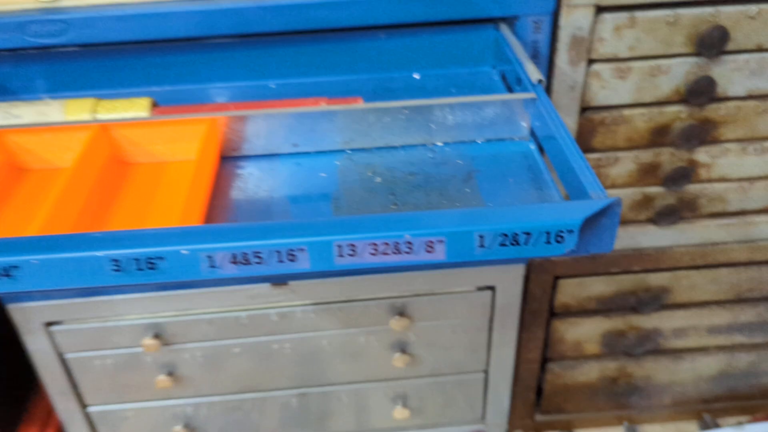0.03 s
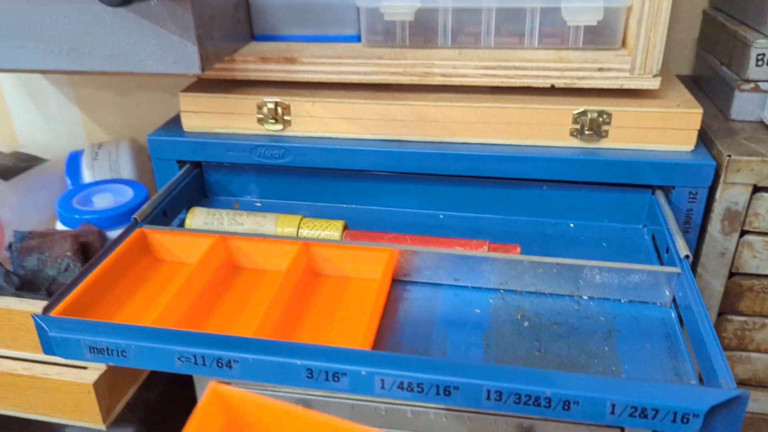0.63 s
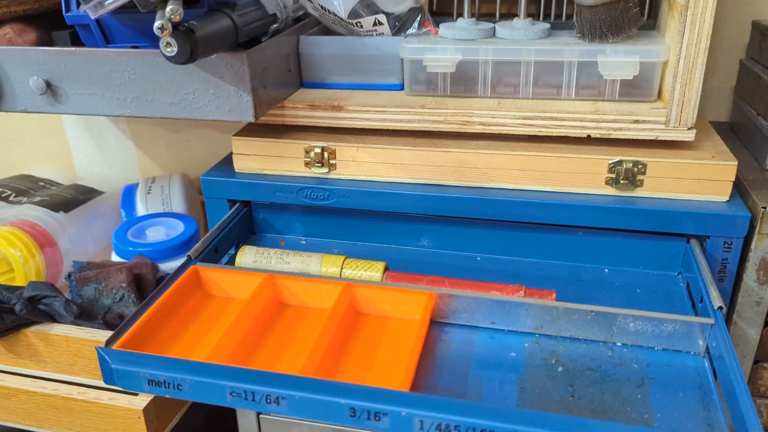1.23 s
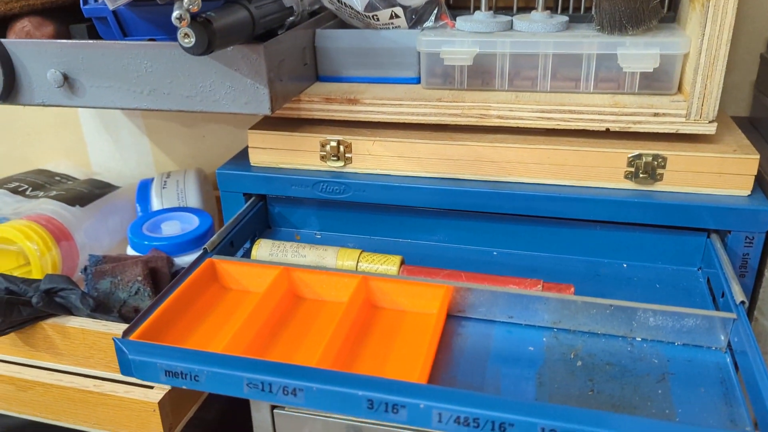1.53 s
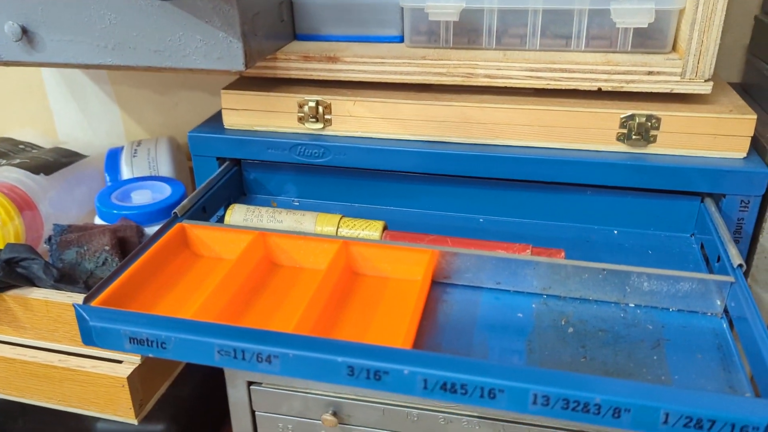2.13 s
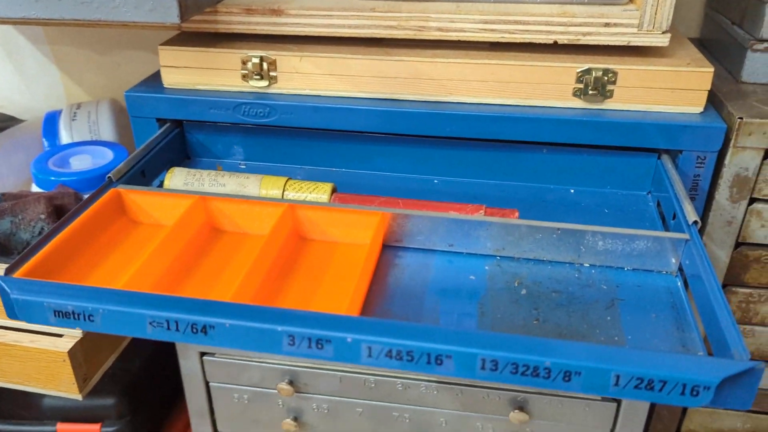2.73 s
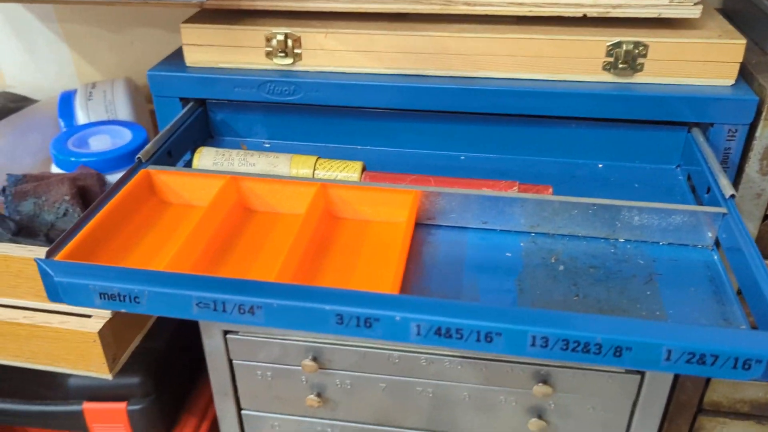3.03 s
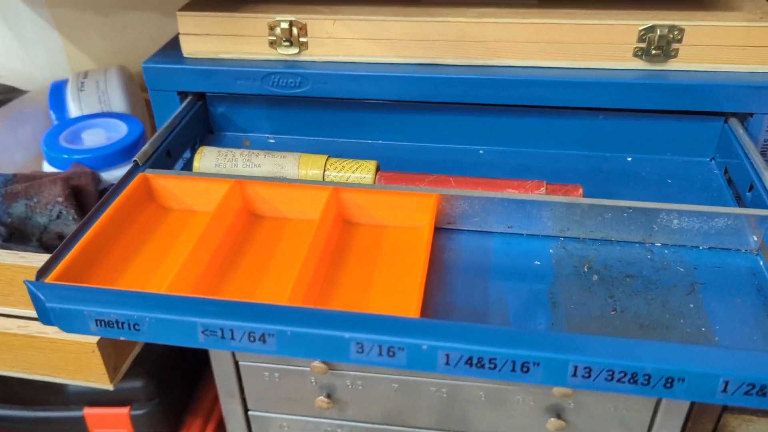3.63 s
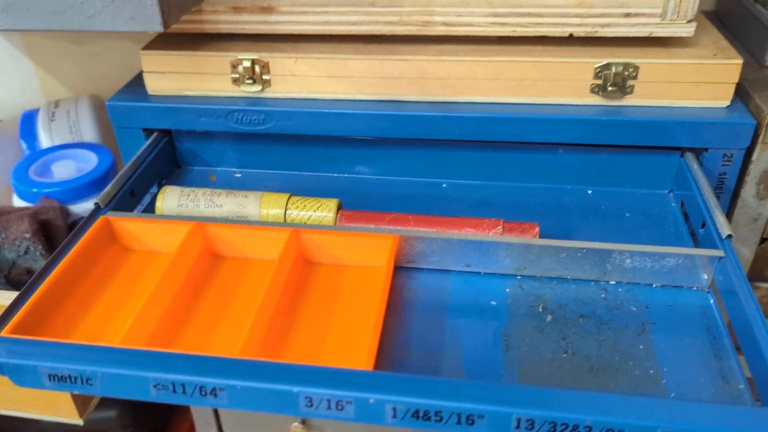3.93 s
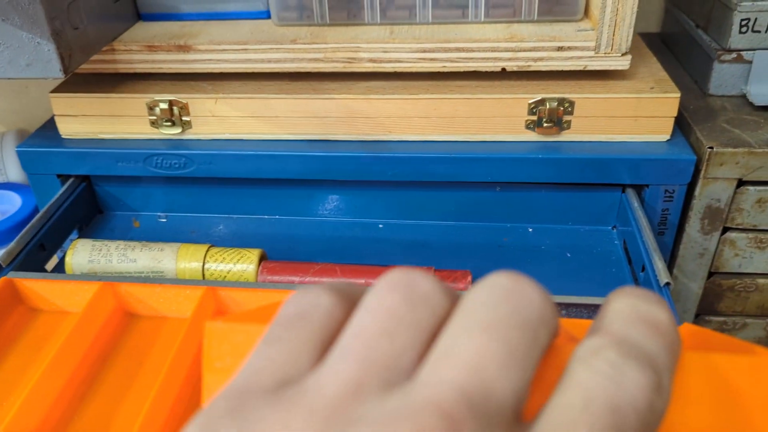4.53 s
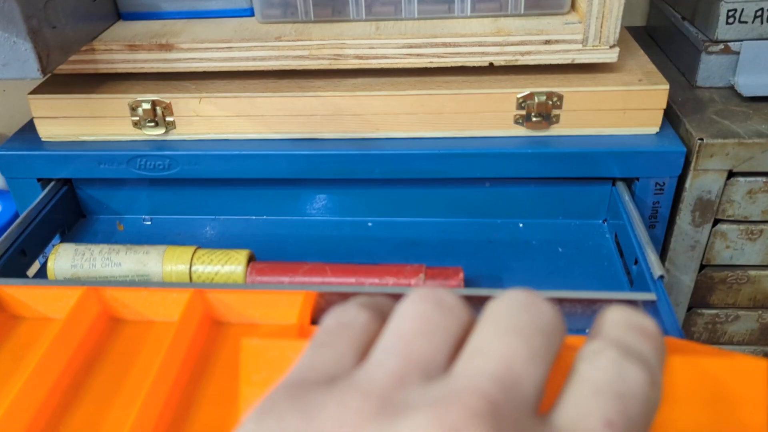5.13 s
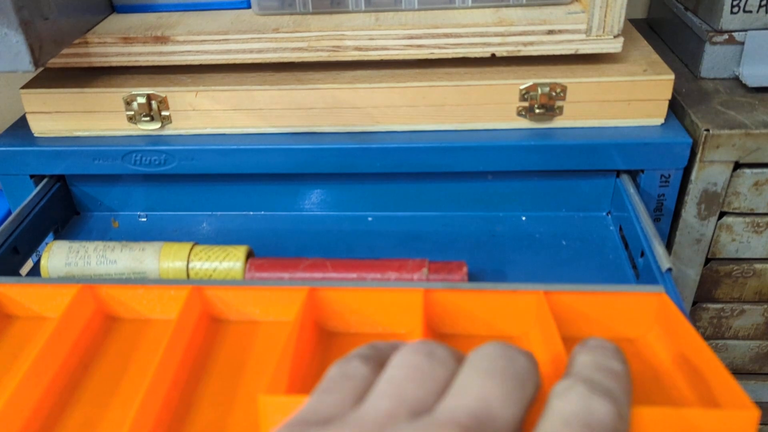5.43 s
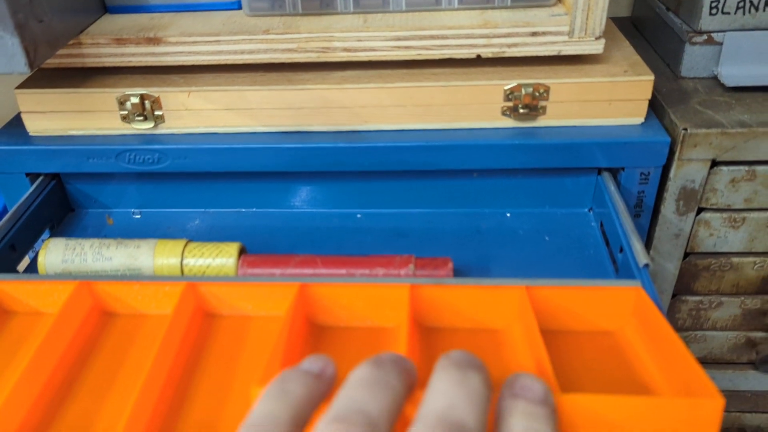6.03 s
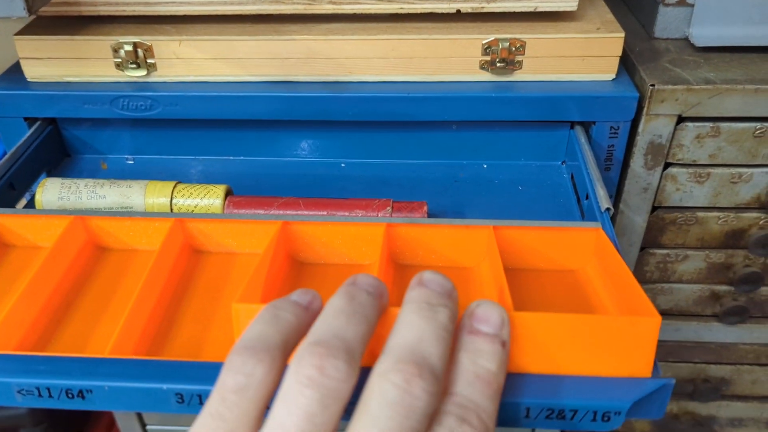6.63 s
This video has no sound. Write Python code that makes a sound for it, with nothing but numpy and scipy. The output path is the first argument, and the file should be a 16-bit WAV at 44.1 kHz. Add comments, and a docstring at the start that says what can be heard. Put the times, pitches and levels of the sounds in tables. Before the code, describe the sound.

Soft plastic rubbing and light clicks, then a few knocks and a louder clatter as a tray lands in a metal drawer, over faint hum.

```python
"""Plastic tray into a steel drawer

Close by, fingers brush a plastic tray and slide it out of its store: many tiny slips make the rubbing.
It knocks and scrapes along the rim of an open tool chest drawer, then drops onto the ringing steel.
Behind it a small workshop murmurs, with mains hum and a faint wavering motor tone."""
import sys
import numpy as np
from scipy import signal
from scipy.fft import rfft, irfft, next_fast_len
from scipy.io import wavfile
from scipy.ndimage import map_coordinates

SR = 44100
rng = np.random.default_rng(int(sys.argv[2]) if len(sys.argv) > 2 else 0)


def wav_record(signal):
    """Record a signal, one row per channel, as 16-bit PCM in the file named by sys.argv[1]."""
    frames = np.transpose(np.atleast_2d(signal))
    bounded = np.clip(frames, -1, 1)
    # unit amplitude maps onto the largest positive 16-bit level
    quanta = np.round(bounded * 32767).astype(np.int16)
    wavfile.write(sys.argv[1], SR, quanta)


N = 299880

# the natural notes of the plastic walls: (pitch [Hz], width [Hz], strength [dB])
TRAY_NOTES = [(710, 1200, -14), (1340, 40, 1), (1780, 51, 7), (1975, 52, -6), (2560, 18, -16),
              (3040, 44, -15), (2860, 26, -3)]
# the natural notes of the steel drawer bottom: (pitch [Hz], level [dB], time to fade by 60 dB [s])
STEEL_NOTES = [(520, -17, 0.38), (600, -9, 0.16), (731, -8.5, 0.31), (834, -8, 0.4), (1027, -2, 0.19),
               (1066, 6, 0.12), (1161, -15, 0.49), (1570, -12, 0.21), (1642, -9, 0.49), (1740, -16, 0.084),
               (1780, -26, 0.48), (1920, -29, 0.72), (2090, -17, 0.06), (2160, -34, 0.29),
               (2239, -23, 0.49), (2200, -27, 0.47), (2380, -16, 0.21), (2380, -6, 0.18), (2690, -23, 0.16),
               (2611, -14, 0.33), (2780, -25, 0.89), (2846, -15.5, 0.58), (2810, -34, 0.59),
               (3060, -18, 0.3)]
# how alike left and right are, for room sound and for close sound: (frequency [Hz], likeness [0 to 1])
AIR_LIKENESS = [(60, 0.86), (400, 0.94), (750, 0.35), (1500, 0.026), (15000, 0.039)]
NEAR_LIKENESS = [(300, 1), (1000, 0.83), (3000, 0.1), (12000, 0.78)]


def tray_drop():
    """The tray lands and bounces: each blow slaps, cracks, rings the steel and shakes the whole chest."""
    # the landing and its bounces: (time [s], relative level [dB])
    blows = [(5.393, -6.5), (5.396, -7), (5.4078, -12.5), (5.42, -22)]
    # tone of the slap and of the shaking chest: (frequency [Hz], level [dB])
    slap_tone = [(80, -46), (200, -32), (430, -30), (560, -19), (800, -8), (1050, 4), (1350, -8.5),
                 (1650, -1.5), (1950, -17), (2600, 2), (3050, -9), (3400, -30), (12000, -33.5),
                 (15800, -54)]
    chest_tone = [(71, -54), (120, -13), (392, -16.5), (481, -17), (522, -6), (566, -13), (627, -15),
                  (906, -6), (1070, -0.5), (1340, -7.5), (2010, -8.5), (2840, -1.5), (3560, -18),
                  (10100, -35.5), (15800, -47)]
    track, t = np.zeros((2, N)), np.arange(SR // 2) / SR
    burst = lambda fade_s: stereo_noise(len(t), NEAR_LIKENESS) * amp(-60 * t / fade_s)
    panels = ripple(spacing_hz=113.7, depth_db=3)
    count = len(STEEL_NOTES)
    for start, db in blows:
        slap = shaped(burst(.094), lambda hz: tone(slap_tone, hz) * below(hz, 3600))
        crack = shaped(burst(.04), lambda hz: tone(slap_tone, hz) * panels(hz) * above(hz, 3360))
        shiver = shaped(burst(.48), lambda hz: tone(chest_tone, hz) * panels(hz))
        # each note reaches left and right at a different point in its wave
        phases = rng.uniform(0, 2 * np.pi, (count, 1, 1)) + rng.normal(0, 1, (count, 2, 1))
        # the tray's weight puts the notes slightly out of tune, and it buzzes on the steel
        tuning = 1 + .004 * rng.standard_normal(count)
        buzz = [map_coordinates(points, [t * 60], order=1, mode="wrap")
                for points in rng.standard_normal((count, 64))]
        phases = phases + .65 * np.array(buzz)[:, None]
        ring = unit(sum(amp(level - 60 * t / fade_s) * np.sin(2 * np.pi * hz * tune * t + phase)
                        for (hz, level, fade_s), phase, tune in zip(STEEL_NOTES, phases, tuning)))
        body = panned(amp(-27) * slap + amp(-28) * ring, pan_db=-3)
        crack_db = -24.5 + .89 * db  # harder blows are brighter
        add(track, start, amp(db) * (body + amp(crack_db) * crack + amp(-29.5) * shiver))
    return track


def tray_knocks():
    """Each knock chatters, touches once more softly and makes the plastic walls ring briefly."""
    # (time [s], relative level [dB], time for the chatter to fade by 60 dB [s], boosted note [Hz])
    touches = [(1.805, -37, 0.017, 1820), (1.906, -27.5, .009, 1780), (2.247, -37.5, 0.022, 1820),
               (2.43, -31, 0.013, 1320), (4.573, -15, 0.043, 1700), (4.621, -28.5, 0.048, 1397),
               (4.717, -38, 0.019, 1400), (4.812, -40, 0.038, 1980), (4.8319, -27, 0.01, 1730),
               (4.846, -14, 0.036, 2090), (5.11, -13.5, 0.072, 1180), (5.229, -35.5, 0.11, 1040),
               (5.325, -24, .05, 1030), (5.384, -14.5, 0.022, 1040)]
    # tone of a knock: (frequency [Hz], level [dB])
    knock_tone = [(71, -29), (120, -17), (462, -17.5), (754, -2.5), (1230, -7), (1390, -1), (1540, -5),
                  (2050, 1), (2410, -5), (3080, -12), (3350, -23), (4360, -19.5), (8220, -35), (11900, -31),
                  (15800, -44)]
    rebound_s, rebound_db = .012, -12.5
    track, t = np.zeros((2, N)), np.arange(SR // 4) / SR
    for start, db, fade_s, ring_hz in touches:
        walls = ripple(spacing_hz=131.5, depth_db=2)
        notes = [*TRAY_NOTES, (ring_hz, 90, 6)]
        plastic = lambda hz: tone(knock_tone, hz) * walls(hz) * resonant(hz, notes, lift_db=1)
        rebound = (t >= rebound_s) * amp(rebound_db - 60 * np.abs(t - rebound_s) / fade_s)
        tail = amp(-21 - 60 * t / .063)
        chatter = stereo_noise(len(t), NEAR_LIKENESS) * (amp(-60 * t / fade_s) + rebound + tail)
        thud = shaped(chatter, lambda hz: plastic(hz) * above(hz, 100, order=2) * below(hz, 713))
        clack = shaped(chatter, lambda hz: plastic(hz) * above(hz, 717) * below(hz, 3500))
        snap = shaped(chatter, lambda hz: plastic(hz) * above(hz, 3300))
        # longer chatter brings more bass and more treble
        thud_db, snap_db = -20.5 + 227.5 * fade_s, -17 + 84.5 * fade_s
        body = panned(clack + amp(thud_db) * thud, pan_db=-3)
        add(track, start, amp(db - 23.5) * (body + amp(snap_db) * snap))
    return track


def wall_scrape():
    """The tray gathers speed down the steel wall, louder and brighter until it falls."""
    # tone of the scrape: (frequency [Hz], level [dB])
    scrape_tone = [(71, -41), (120, -12), (277, -6), (384, -9), (434, -7), (491, -15), (627, -7.5),
                   (870, -9.5), (1090, -4), (1540, -12.5), (1670, -10.5), (2840, -11.5), (3940, -26),
                   (6300, -26.5), (15800, -37)]
    start, end = 5.17, 5.388
    seconds_left = np.maximum(end - np.arange(N) / SR, 0)
    body_gain, hiss_gain = amp(-103 * seconds_left), amp(-7.5 - 138 * seconds_left)
    notes = [(hz, 30, db) for hz, db, _ in STEEL_NOTES]  # the tray's touch widens each note to 30 Hz
    steel = lambda hz: tone(scrape_tone, hz) * resonant(hz, notes, lift_db=0)
    body, hiss = friction(steel, start, end, slips_per_s=250, rough_db=2)
    scrape = gate(start, end, edge_s=.012) * (body_gain * body + hiss_gain * hiss)
    return panned(amp(-29) * scrape, pan_db=-1)


def rim_judder():
    """Pressed on the rim, the tray creeps in coarse, dull slips that fade after each catch."""
    # the creeps: (start [s], end [s], relative starting level [dB])
    creeps = [(4.592, 4.659, -31), (4.72, 4.791, -29.5), (4.811, 4.861, -34)]
    # their tone: (frequency [Hz], level [dB])
    creep_tone = [(150, -48), (250, -17), (540, -8), (829, -14), (919, -9.5), (1410, -11), (2060, -10),
                  (2400, -21), (2950, -16.5), (3560, -34), (4680, -18), (5280, -33), (15000, -36)]
    t, fade_db_per_s = np.arange(N) / SR, 110
    force = sum(gate(start, end, edge_s=.02) * amp(db - fade_db_per_s * np.maximum(t - start, 0))
                for start, end, db in creeps)
    plastic = lambda hz: tone(creep_tone, hz) * resonant(hz, TRAY_NOTES, lift_db=7)
    body, hiss = friction(plastic, creeps[0][0], creeps[-1][1], slips_per_s=290, rough_db=1.5)
    return panned(force * (amp(-5) * body + amp(-24.5) * hiss), pan_db=-1)


def tray_slide():
    """The tray is drawn over its support in gritty pulls, with a light drag between them."""
    # the pulls: (start [s], end [s], relative level [dB], hiss compared with the body [dB])
    pull_times = [(1.682, 1.79, -48, -2), (1.802, 1.822, -32.5, -6.5), (1.838, 1.912, -35, -7.5),
                  (1.992, 2.052, -39.5, -0.5), (2.1, 2.145, -44, .5), (2.16, 2.228, -49, 0),
                  (2.336, 2.366, -34, -3.5), (2.405, 2.455, -51, -5), (2.458, 2.503, -41.5, 1),
                  (2.555, 2.612, -42, -5.5), (3.055, 3.115, -44.5, -2), (3.135, 3.195, -46, -1),
                  (3.315, 3.35, -52, -6), (3.355, 3.41, -45, 2), (3.553, 3.595, -46, -4),
                  (3.72, 3.88, -56, -0.5), (3.785, 3.82, -49, 0.5), (3.885, 3.938, -46.5, -4.5)]
    # tone of the rubbing: (frequency [Hz], level [dB])
    slide_tone = [(380, -33), (650, -8), (763, -15.5), (849, -9), (1110, -4), (1390, -9.5), (2640, -5.5),
                  (2860, -6), (3400, -13), (4160, -14), (8100, -17), (12100, -16), (15800, -27)]
    # notes of the tray on its support: (pitch [Hz], width [Hz], strength [dB])
    notes = [(860, 58, -5), (1126, 47, -14), (1340, 36, -5), (1710, 280, 1.5), (2260, 96, -16),
             (2773, 53, -9), (6190, 83, -2.5)]
    rubbed = lambda hz: tone(slide_tone, hz) * resonant(hz, notes, lift_db=6)
    pulls = strokes(pull_times, rubbed, grit_db=2.1, focus_db=-2.5, width_hz=300,
                    ramp_share=.32, arch_db=.5, pan_db=-2.5, hiss_pan_db=1.5)
    # the drag breaks loose loudly, eases, then slowly dies away
    start, end, ease_s, fade_db_per_s = 2.318, 3.6, .17, 2
    since = np.maximum(np.arange(N) / SR - start, 0)
    drag_db = -54 + 8.5 * np.exp(-since / ease_s) - fade_db_per_s * since + 2.8 * wobble(18)
    body, hiss = friction(rubbed, start, end, slips_per_s=460, rough_db=1.7)
    drag = gate(start, end, edge_s=.005) * amp(drag_db) * (panned(body, pan_db=-2.5) + amp(1) * hiss)
    return amp(-1.3) * (pulls + drag)


def tray_chirps():
    """The tray sticks and slips in step with one of its own notes for a moment, and chirps."""
    # (time [s], level [dB], pitch [Hz])
    chirps = [(2.11, -43.5, 1000), (2.428, -32.5, 1390), (2.566, -52, 1420), (2.597, -38, 1120),
              (2.632, -43, 1150)]
    return noisy_notes(chirps, SR // 6, NEAR_LIKENESS, spread_hz=190, rise_s=.0015, fade_s=.082)


def finger_brush():
    """Skin glides over the plastic in short, light strokes."""
    # the scuffs: (start [s], end [s], relative level [dB], hiss compared with the body [dB])
    scuffs = [(.14, .2, -61, -3.5), (.215, .355, -53.5, 0), (.675, .768, -46.5, -8.5),
              (1.045, 1.095, -50, -6.5), (1.125, 1.205, -49.5, -9), (4.044, 4.058, -52.5, -8),
              (4.073, 4.106, -49.5, -7.5), (4.19, 4.254, -48.5, -3.5), (4.295, 4.345, -55.5, -5),
              (5.02, 5.06, -61, 1.5), (5.775, 5.85, -53.5, -1.5), (6.0, 6.22, -56.5, -2.5),
              (6.76, 6.8, -55, -4)]
    # their tone: (frequency [Hz], level [dB])
    brush_tone = [(530, -36), (900, -13), (956, -19.5), (1160, -14.5), (1450, -12), (2130, -3.5),
                  (3530, -20.5), (4080, -16), (5060, -31.5), (5910, -18), (7980, -23.5), (11800, -23),
                  (15800, -36.5)]
    # notes of the tray under the fingers: (pitch [Hz], width [Hz], strength [dB])
    notes = [(1125, 77, 11), (2260, 36, -40), (2590, 23, -3), (2960, 33, -17), (3780, 38, -20),
             (4450, 53, -26), (4620, 65, 9), (5730, 340, -21)]
    held = lambda hz: tone(brush_tone, hz) * resonant(hz, notes, lift_db=1.5)
    return amp(2) * strokes(scuffs, held, grit_db=2, focus_db=-4, width_hz=260,
                            ramp_share=.38, arch_db=3.5, pan_db=-4.5, hiss_pan_db=1)


def drawer_booms():
    """The wide drawer bottom bends when pushed and gives a low, soft note."""
    # (time [s], level [dB], pitch [Hz])
    pushes = [(2.015, -47.5, 121), (4.865, -47, 230), (5.116, -47, 180), (5.443, -45.5, 162)]
    return noisy_notes(pushes, SR // 3, AIR_LIKENESS, spread_hz=28, rise_s=.0074, fade_s=.32)


def room_echo(x):
    """The small room's echo: alike at both ears in the bass, unrelated in the treble."""
    # (frequency [Hz], time for the echo to fade by 60 dB [s])
    fade_times = [(150, 0.53), (1000, 0.43), (3000, 0.33), (12000, 0.42)]
    hz, t, spectrum = signal.stft(stereo_noise(SR // 2, AIR_LIKENESS), SR, nperseg=256)
    tail = signal.istft(spectrum * amp(-60 * t / along(fade_times, hz)[:, None]), SR, nperseg=256)[1]
    tail = np.pad(tail / np.linalg.norm(tail[0]), ((0, 0), (SR // 200, 0)))  # arrives 5 ms late
    return signal.fftconvolve(x, tail, axes=1)[:, :N]


def workshop():
    """Air noise, a distant motor, mains hum, a thin whine and one soft, low swell of noise."""
    # tone of the air: (frequency [Hz], level [dB])
    air_tone = [(28, -35), (38, -16), (48, -3.5), (80, -8.5), (123, -8.5), (187, -19), (283, -7),
                (399, -11.5), (474, -6), (591, -15), (640, -5), (730, -13.5), (1300, -17), (2200, -15.5),
                (3000, -23), (4200, -31), (7500, -39.5), (15800, -43.5)]
    # the motor runs a little faster and louder toward the end: (time [s], pitch [Hz], level [dB])
    motor_run = [(.1, 627.4, -65), (3.901, 633, -61), (4.5, 638.4, -65), (6.4, 644.7, -55), (6.8, 648, -59)]
    # the two moments when the whine stands out: (time [s], level [dB])
    whine_peaks = [(1.48, -83.5), (6.5, -80)]
    t = np.arange(N) / SR
    air = shaped(stereo_noise(N, AIR_LIKENESS), lambda hz: tone(air_tone, hz))
    air *= amp(-53 - 3 * np.exp(-t) + .23 * wobble(3.25))  # creeps up to a steady level
    times, pitches, levels = np.transpose(motor_run)
    motor_phase = 2 * np.pi * np.cumsum(np.interp(t, times, pitches) + 2.14 * wobble(40)) / SR
    motor = amp(np.interp(t, times, levels) + 1.16 * wobble(11)) * unit(np.sin(motor_phase))
    hum_hz, whine_hz, swell_peak_s = 121.7, 3250, .79
    hum = amp(-72 + 2 * wobble(3.6)) * unit(np.sin(2 * np.pi * hum_hz * t))
    whine_phase = 2 * np.pi * np.cumsum(whine_hz * (1 + .011 * wobble(270))) / SR
    whine_gain = amp(-87) + sum(amp(db - 5.5 * ((t - at) / .35) ** 2) for at, db in whine_peaks)
    whine = whine_gain * (amp(6) * np.sin(whine_phase) + np.sin(2 * whine_phase))
    swell_db = -54.5 - np.maximum(55 * (swell_peak_s - t), 11.5 * (t - swell_peak_s))  # fast up, slow down
    low_band = lambda hz: above(hz, 275, order=10) * below(hz, 297, order=10)
    swell = amp(swell_db) * shaped(stereo_noise(N, AIR_LIKENESS), low_band)
    return air + motor + hum + whine + swell


def strokes(table, colour, grit_db, focus_db, width_hz, ramp_share, arch_db, pan_db, hiss_pan_db):
    """Each stroke is a run of tiny, uneven slips; where it presses decides which note stands out."""
    # the note that stands out as the touch wanders over the tray: (time [s], pitch [Hz])
    touch_notes = [(.2, 1920), (1.7, 2100), (1.84, 900), (2.1, 1020), (2.3, 1540), (2.6, 1340), (3.1, 2100),
                   (6.2, 2680)]
    track, lead_s = np.zeros((2, N)), .1
    t = np.arange(SR // 2) / SR - lead_s
    catches = lambda rate: map_coordinates(rng.standard_normal(512), [(t + lead_s) * rate], mode="wrap")
    for start, end, body_db, hiss_db in table:
        ring_hz, length = np.interp(start, *np.transpose(touch_notes)), end - start
        # long strokes start and stop more gently, and all are fastest midway
        ramp_s = ramp_share * length + .006
        outside_s = np.abs(t - length / 2) - length / 2
        arch = amp(-arch_db * np.minimum((2 * t / length - 1) ** 2, 2))
        press = np.sin(np.pi / 2 * np.clip(.5 - outside_s / ramp_s, 0, 1)) * arch
        light_touch = amp(-14.5) * np.exp(-np.maximum(outside_s, 0) / .026)  # lingers at both ends
        slips = stereo_noise(len(t), NEAR_LIKENESS) * amp(grit_db * catches(402.6) + .71 * catches(75.2))
        # every grip wakes a different mix of wall notes
        walls, edges = ripple(spacing_hz=110, depth_db=3.2), ripple(spacing_hz=220, depth_db=2.4)
        focused = lambda hz: colour(hz) * resonant(hz, [(ring_hz, width_hz, 0)], focus_db)
        body = shaped(slips, lambda hz: focused(hz) * walls(hz) * below(hz, 3480))
        hiss = shaped(slips, lambda hz: focused(hz) * edges(hz) * above(hz, 3460))
        rub = panned(body, pan_db) + amp(hiss_db) * panned(hiss, hiss_pan_db)
        add(track, start - lead_s, amp(body_db) * np.maximum(press, light_touch) * rub)
    return track


def friction(colour, start, end, slips_per_s, rough_db):
    """Tiny, uneven slips from just before start to just after end, split into a lower body and a hiss."""
    body, hiss = np.zeros((2, 2, N))
    size = next_fast_len(round((round(end - start, 1) + .3) * SR))
    slips = stereo_noise(size, NEAR_LIKENESS) * amp(rough_db * wobble(slips_per_s)[:size])
    add(body, start - .1, shaped(slips, lambda hz: colour(hz) * below(hz, 3240)))
    add(hiss, start - .1, shaped(slips, lambda hz: colour(hz) * above(hz, 3270)))
    return body, hiss


def noisy_notes(table, size, likeness, spread_hz, rise_s, fade_s):
    """Short notes made of noise around one pitch; each fades by 60 dB in fade_s."""
    track, t = np.zeros((2, N)), np.arange(size) / SR
    for start, db, pitch_hz in table:
        note = shaped(stereo_noise(size, likeness), lambda hz: 1 / (1 + ((hz - pitch_hz) / spread_hz) ** 2))
        add(track, start, amp(db - 60 * t / fade_s) * (1 - np.exp(-t / rise_s)) * note)
    return track


def amp(db):
    """Turn decibels into a gain, the number a sound is multiplied by."""
    return 10 ** (np.asarray(db) / 20)


def unit(x):
    """Scale x to an average (rms) level of 1."""
    return x / np.sqrt(np.mean(x ** 2) + 1e-20)


def along(points, hz):
    """Read between (frequency, value) points, with all octaves equally wide."""
    frequencies, values = np.transpose(points)
    return np.interp(np.log(hz + 1), np.log(frequencies + 1), values)


def tone(points, hz):
    """The gain that a tone table gives at hz."""
    return amp(along(points, hz))


def below(hz, edge_hz, order=6):
    """Gain that keeps what lies below the edge (a low-pass)."""
    return 1 / np.sqrt(1 + (hz / edge_hz) ** (2 * order))


def above(hz, edge_hz, order=6):
    """Gain that keeps what lies above the edge (a high-pass)."""
    return np.sqrt(1 - below(hz, edge_hz, order) ** 2)


def resonant(hz, notes, lift_db):
    """Gain with a peak at each natural note; weak notes stand out less."""
    return 1 + amp(lift_db) * sum(amp(db / 2) / (1 + (2 * (hz - pitch) / width) ** 2)
                                  for pitch, width, db in notes)


def ripple(spacing_hz, depth_db):
    """A bumpy random gain curve for the many small wall notes, too close together to list."""
    points = rng.standard_normal(1024)
    return lambda hz: amp(depth_db * map_coordinates(points, [hz / spacing_hz], mode="wrap"))


def shaped(x, gain):
    """Filter x with a gain curve, then scale it to an average level of 1."""
    length = x.shape[-1]
    size = 2 * next_fast_len(length // 2 + 2048)
    cepstrum = irfft(np.log(np.maximum(gain(np.fft.rfftfreq(size, 1 / SR)), 1e-6)))
    # folding it in half makes the filter ring after a sound, never before
    cepstrum[1:size // 2] *= 2
    cepstrum[size // 2 + 1:] = 0
    return unit(irfft(rfft(x, size) * np.exp(rfft(cepstrum)), size)[..., :length])


def wobble(rate):
    """A smooth random curve through rate points a second."""
    return map_coordinates(rng.standard_normal(int(N * rate / SR) + 4), [np.arange(N) * rate / SR])


def stereo_noise(size, likeness):
    """White noise whose left and right are partly alike."""
    angle = np.arccos(np.clip(along(likeness, np.fft.rfftfreq(size, 1 / SR)), -.99, .99)) / 2
    mid, side = irfft(rfft(rng.standard_normal((2, size))) * [np.cos(angle), np.sin(angle)], size)
    return np.array([mid + side, mid - side])


def gate(start, end, edge_s):
    """Gain that opens at start and closes at end, with soft edges."""
    t = np.arange(N) / SR
    return np.clip(np.minimum(t - start, end - t) / edge_s + .5, 0, 1)


def panned(x, pan_db):
    """Set the left side pan_db above the right; below zero leans right."""
    return x * amp([[pan_db / 2], [-pan_db / 2]])


def from_left(x, lead_s):
    """The left side of the microphone hears x a little before the right."""
    size = next_fast_len(N + SR // 2)
    shift = np.exp(1j * np.pi * np.fft.rfftfreq(size, 1 / SR) * lead_s * np.array([[1], [-1]]))
    return irfft(rfft(x, size) * shift, size)[:, :N]


def add(track, start_s, sound):
    """Mix a sound into the track at start_s."""
    part = track[:, round(start_s * SR):][:, :sound.shape[1]]
    part += sound[:, :part.shape[1]]


def scene():
    """Rubs and hits close to the microphone, their echo, and the workshop behind."""
    rubs = from_left(finger_brush() + tray_slide() + tray_chirps(), lead_s=.00006)
    rubs = rubs + rim_judder() + wall_scrape()
    hits = tray_knocks() + tray_drop()
    echo = room_echo(amp(-11) * rubs + amp(-10.5) * hits)
    return rubs + hits + echo + drawer_booms() + workshop()


def record(dry):
    """Fade in, round off the highest peaks and cut the very top of the treble."""
    ceiling, top_hz = .9, 15830
    faded_in = dry * gate(.042, np.inf, edge_s=.012)
    rounded = faded_in / (1 + np.abs(faded_in / ceiling) ** 6) ** (1 / 6)
    size = next_fast_len(N + SR // 2)
    return irfft(rfft(rounded, size) * (np.fft.rfftfreq(size, 1 / SR) < top_hz), size)[:, :N]


dry = scene()
out = record(dry)
wav_record(out)
```